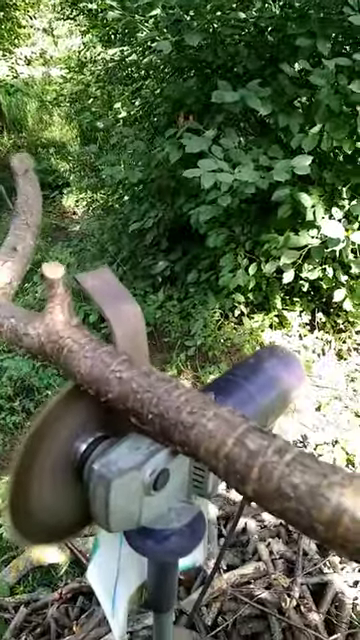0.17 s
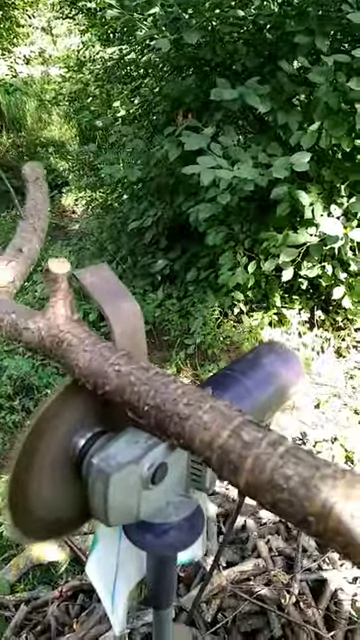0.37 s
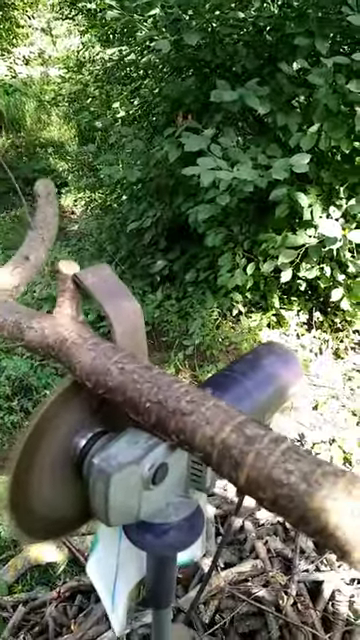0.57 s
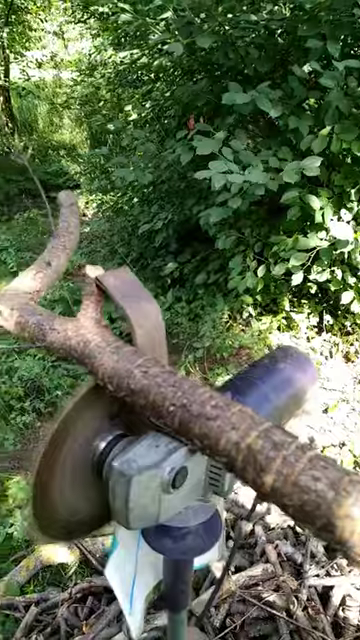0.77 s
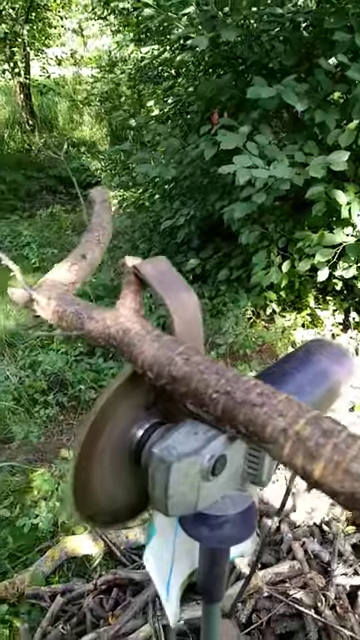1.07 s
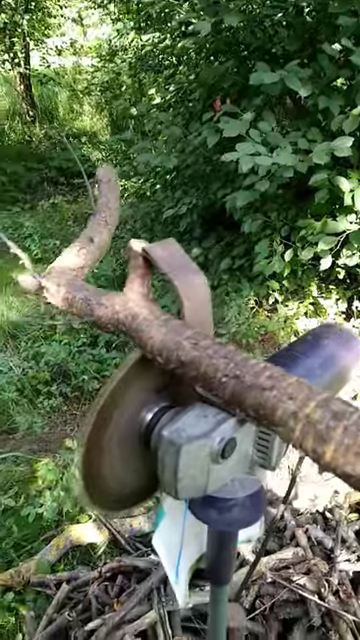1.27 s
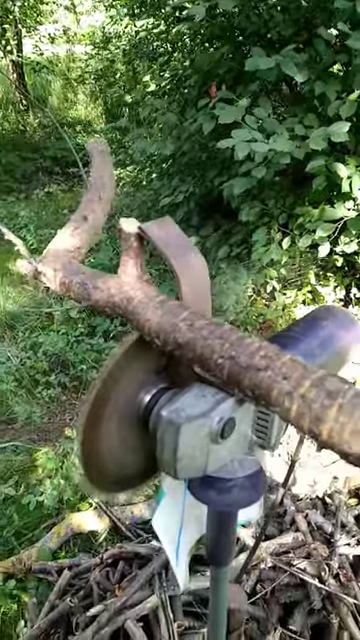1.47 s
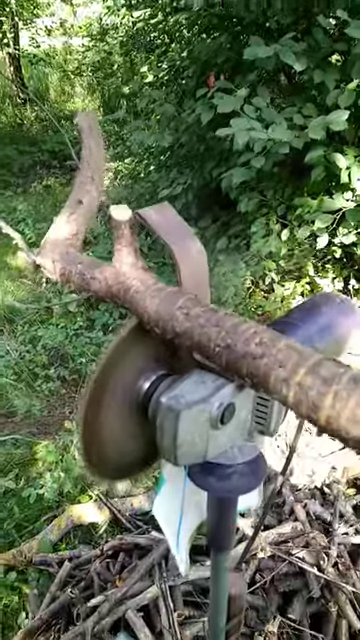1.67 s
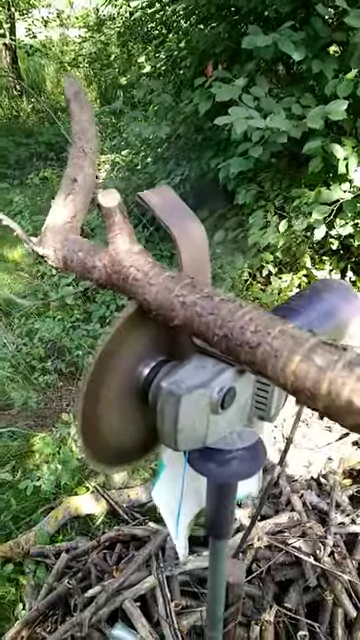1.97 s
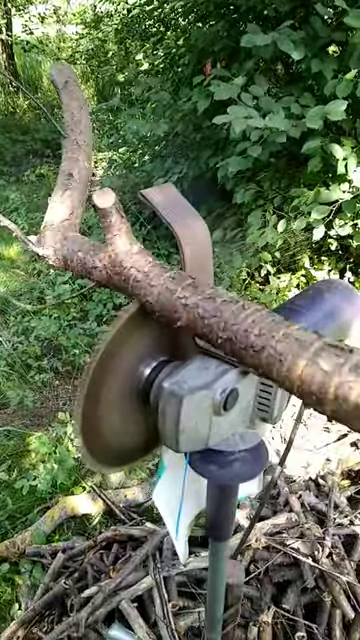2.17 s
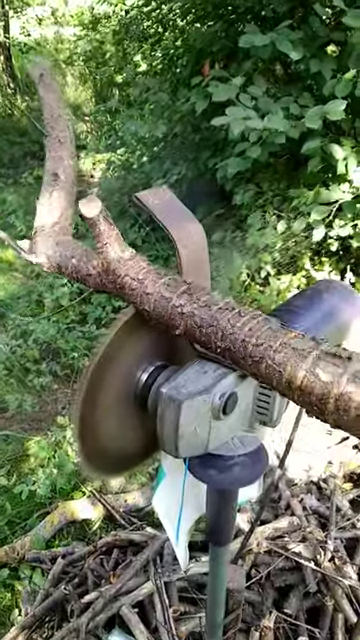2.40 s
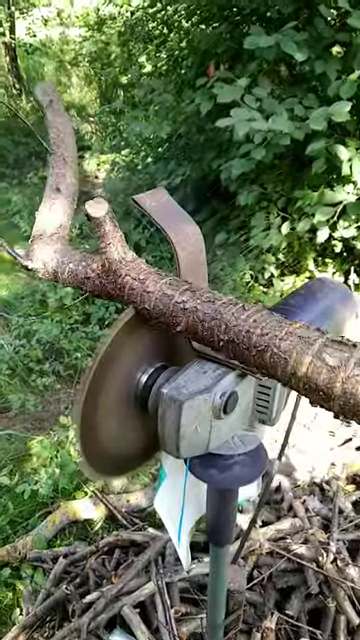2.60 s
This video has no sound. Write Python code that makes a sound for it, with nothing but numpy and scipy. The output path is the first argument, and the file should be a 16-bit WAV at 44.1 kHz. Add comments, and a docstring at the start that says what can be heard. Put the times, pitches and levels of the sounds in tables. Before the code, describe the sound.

An angle grinder runs loudly throughout, close and outdoors, with rushing fan air and gear whir. Bright, metallic rasping opens the cut; sharp squeals come at 0.4 and 0.6-0.75 seconds. The motor glides down in pitch until about 2.4. A brief screech hits at 1.3, woody scrapes and chip snaps around 1.6-2.2, and a hiss at 2.4-2.6. Soft wind puffs come mostly before 1.3.

```python
"""Branch on an angle grinder

A branch is pressed onto the saw disc of a mounted angle grinder, outdoors and close by.
The load drags the spindle down; the steel disc rings in modes that shift as it slows, and some sing or squeal.
Bands of noise make the teeth rasp in the wood, over the rush of the fan and the whir of the gears.
Puffs of low noise are the gusts that brush the microphone."""
import sys
import numpy as np
from scipy import signal
from scipy.fft import rfft, irfft
from scipy.io import wavfile

SR = 44100
rng = np.random.default_rng(int(sys.argv[2]) if len(sys.argv) > 2 else 0)


def put_to_file(sound):
    """Save the sound as 16-bit audio at rate SR, in the file named by the first command-line argument."""
    columns = np.atleast_2d(sound).T  # one column per channel
    safe = np.clip(columns, -1, 1)
    whole_steps = np.round(safe * 32767)
    wavfile.write(sys.argv[1], SR, whole_steps.astype(np.int16))


N = 120834
T, HZ = np.arange(N) / SR, np.fft.rfftfreq(N, 1 / SR)
CUTOFF_HZ = 15600


def amp(db):
    """Turns decibels into gain."""
    return 10 ** (np.asarray(db) / 20)


def unit(x):
    """Scales each channel to an average strength (rms) of 1."""
    return x / np.sqrt(np.mean(abs(x) ** 2, axis=-1, keepdims=True) + 1e-20)


def curve(rows, axis=1):
    """Reads one column of a time table at every sample."""
    rows = np.array(rows)
    return np.interp(T, rows[:, 0], rows[:, axis])


def spectrum(rows):
    """Reads a frequency table at every frequency of the spectrum."""
    hz, value = np.transpose(rows)
    return np.interp(np.log(HZ + 1), np.log(hz), value)


def pan(db):
    """Left and right gains of constant power; positive is louder on the left."""
    g = amp(np.array([[.5], [-.5]]) * db)
    return g / np.sqrt(np.mean(g ** 2, axis=0))


def noise(gain, likeness):
    """Coloured stereo noise; likeness 1 means both channels are the same, 0 unrelated."""
    a, b = rfft(rng.standard_normal((2, N)))
    c = np.clip(likeness, -1, 1)
    right = c * a + np.sqrt(1 - c ** 2) * b
    return unit(irfft(np.array([a, right]) * gain, N))


def wander(hz):
    """Smooth random movement, up to about the given rate."""
    return unit(irfft(rfft(rng.standard_normal(N)) * np.exp(-(HZ / hz) ** 2), N))


def flutter(hz):
    """Smooth random movement at a low rate, drawn on a coarse time grid."""
    count = N // 64
    coarse_hz = np.fft.rfftfreq(count, T[-1] / count)
    slow = irfft(rfft(rng.standard_normal(count)) * np.exp(-(coarse_hz / hz) ** 2), count)
    return np.interp(T, np.linspace(0, T[-1], count), unit(slow))


def phase(hz):
    """Running angle of a tone whose frequency may move."""
    return 2 * np.pi * np.cumsum(hz * np.ones(N)) / SR


SKIRT = 2.8  # the second filter is this many times wider


def resonate(x, hz, width_hz):
    """A moving resonance: shift its pitch to zero, smooth twice, shift back."""
    turn = np.exp(1j * phase(hz))
    z = x / turn
    for w in (width_hz, width_hz * SKIRT):
        r = np.exp(-np.pi * abs(w) / SR)
        z = signal.lfilter([1 - r], [1, -r], z)
    return unit((z * turn).real)


def band(low_hz, high_hz, steepness):
    """Gain of a band-pass at every frequency."""
    below = (low_hz / np.maximum(HZ, low_hz / 10)) ** (2 * min(steepness, 100))
    above = (HZ / high_hz) ** (2 * steepness)
    return 1 / np.sqrt((1 + below) * (1 + above))


# likeness of left and right in friction and fan noise: f/Hz, likeness (-1 to 1)
LEFT_RIGHT_LIKENESS = [(60, -0.18), (1000, 0.11), (2500, -0.047), (4500, -0.44), (8000, 0.072),
                       (14000, -0.14)]


def rub(low_hz, high_hz, level, steepness):
    """A band of friction noise that follows its level and left-right curves."""
    hiss = noise(band(low_hz, high_hz, steepness), spectrum(LEFT_RIGHT_LIKENESS))
    return hiss * amp(curve(level)) * pan(curve(level, axis=2))


PATCH_DB, PATCH_WIDTH_HZ, PATCH_S, PATCH_FROM_HZ = 5.8, 65, .07, 2700  # dB at depth 1


def uneven_treble(x, depth):
    """Uneven treble: small random patches of the sound grow louder and softer."""
    hz, t, z = signal.stft(x, SR, nperseg=1024, noverlap=768)
    across = np.fft.fftfreq(len(hz), hz[1])[:, None]
    along = np.fft.fftfreq(len(t), t[1])
    smooth = np.exp(-(np.pi * across * PATCH_WIDTH_HZ) ** 2 - (np.pi * along * PATCH_S) ** 2)
    field = np.fft.ifft2(np.fft.fft2(rng.standard_normal(smooth.shape)) * smooth).real
    # starts at half of PATCH_FROM_HZ and is full from there up
    depth_db = depth * PATCH_DB * np.clip(2 * hz / PATCH_FROM_HZ - 1, 0, 1)[:, None]
    gain = amp(depth_db * np.minimum(field / field.std(), 1))
    return signal.istft(z * gain, SR, nperseg=1024, noverlap=768)[1][:, :N]


# speed of the spindle under load: t/s, speed (turns per second)
SPINDLE_SPEED = [(0, 154), (.35, 148.6), (.78, 138.6), (1.3, 128.8), (1.7, 122.6), (2, 119.9), (2.4, 118.2),
                 (2.74, 118.5)]
FAST_HZ, SLOW_HZ = 154, 118.2  # turns per second
WOBBLE, WOBBLE_HZ = 0.001112, 25.85  # share of the speed, rate


def spindle():
    """The load slows the spindle: its speed, how far it has slowed (0 to 1) and its angle."""
    spin = curve(SPINDLE_SPEED)
    slowed = (FAST_HZ - spin) / (FAST_HZ - SLOW_HZ)
    angle = phase(spin * (1 + WOBBLE * wander(WOBBLE_HZ)))
    return spin, slowed, angle


MODE_SWELL_DB, MODE_SWELL_HZ, MODE_DRIFT = 3.3, 9, .0014  # drift is a share of the frequency


def mode(drive, hz, width_hz):
    """One disc mode swells, fades and drifts as the branch shifts on the rim."""
    swell = unit(amp(MODE_SWELL_DB * np.minimum(flutter(MODE_SWELL_HZ), 1)))
    return swell * resonate(drive, hz * (1 + MODE_DRIFT * flutter(MODE_SWELL_HZ)), width_hz)


# ringing modes of the steel disc, before the ringing strength below:
# f/Hz at full speed, f/Hz slowed, level/dB at full speed, level/dB slowed, width/Hz, left over right/dB
DISC_MODES = [(3280, 3190, -27.5, -40.5, 105, -20), (3546, 3620, -42, -38, 33, -5),
              (4155, 3900, -31, -50, 60, -7), (4730, 4832, -35.5, -42, 29, 4),
              (6200, 6248, -52, -32.5, 30, -4), (6450, 6440, -26, -65, 27, -4),
              (7700, 7415, -38.5, -31, 47, -3), (7905, 7500, -26, -31.5, 15, -10),
              (7780, 7850, -41, -44.5, 41, 7), (9220, 8860, -27.5, -36.5, 45, 5),
              (9420, 9252, -23.5, -32.5, 44, -9), (10630, 10270, -32, -34, 71, 14),
              (10920, 10720, -41, -37, 70, 11), (11720, 11210, -46, -39.5, 31, 8),
              (12150, 11700, -41.5, -41.5, 33, 8), (13400, 13280, -36, -36, 53, 8)]
# how hard the disc is set ringing: t/s, level/dB added to every mode
RING_STRENGTH = [(0, -3), (.55, -3), (.7, 2.5), (.85, -5), (1.3, -1), (2.2, -2.5), (2.74, 0)]
TOOTH_SHARE, TOOTH_SPREAD_DB, DISC_LIKENESS = 0.13, 5.5, 0.54


def disc(angle, slowed):
    """Friction and the once-a-turn pattern of the teeth ring the modes of the disc."""
    orders = np.arange(18, 128)  # waves per turn
    chance = rng.standard_normal((len(orders), 2))
    grid = np.linspace(0, 2 * np.pi, 4096)
    pattern = 0
    for k, (a, b) in zip(orders, chance):
        pattern = pattern + amp(TOOTH_SPREAD_DB * a) * np.cos(k * grid + 2 * np.pi * b)
    teeth = unit(np.interp(angle % (2 * np.pi), grid, pattern))
    friction = noise(HZ < CUTOFF_HZ, DISC_LIKENESS)
    drive = np.sqrt(TOOTH_SHARE) * teeth + np.sqrt(1 - TOOTH_SHARE) * friction
    out = 0
    for fast, slow, fast_db, slow_db, width, side_db in DISC_MODES:
        level = amp(fast_db + (slow_db - fast_db) * slowed)
        out = out + pan(side_db) * level * mode(drive, fast + (slow - fast) * slowed, width)
    return out * amp(curve(RING_STRENGTH))


# a whining mode of the disc: t/s, level/dB
WHINE_LEVEL = [(0, -44), (.2, -33.5), (.34, -23), (.45, -29.5), (.56, -23.5), (.66, -33.5), (.76, -27.5),
               (.88, -31.5), (1.21, -33), (1.28, -19.5), (1.36, -37), (1.49, -28), (1.6, -33.5),
               (1.67, -28.5), (1.85, -34.5), (2.3, -31), (2.74, -28.5)]
WHINE_FAST_HZ, WHINE_SLOW_HZ, WHINE_WIDTH_HZ = 4430, 4320, 47
WHINE_CLEAN, WHINE_WOBBLE = 0.47, 0.003796  # power share of pure tone, share of the frequency
WHINE_GLIDE_SHARE, WHINE_GLIDE_WIDTH_HZ = .45, 100


def whine(angle, slowed):
    """One mode sings; multiples of the spindle speed glide down through it and roughen its edge."""
    hz = WHINE_FAST_HZ + (WHINE_SLOW_HZ - WHINE_FAST_HZ) * slowed
    tone = unit(np.sin(phase(hz * (1 + WHINE_WOBBLE * wander(hz=35.0)))))
    teeth = sum(np.cos(k * angle + 2 * np.pi * rng.random()) for k in range(27, 40))
    glide = resonate(teeth, hz, WHINE_GLIDE_WIDTH_HZ)
    friction = resonate(noise(1, 0.47), hz, WHINE_WIDTH_HZ)
    rough = np.sqrt(WHINE_GLIDE_SHARE) * glide + np.sqrt(1 - WHINE_GLIDE_SHARE) * friction
    return (np.sqrt(WHINE_CLEAN) * tone + np.sqrt(1 - WHINE_CLEAN) * rough) * amp(curve(WHINE_LEVEL))


# the singing mode, between squeals: t/s, level/dB, left over right/dB
SING_LEVEL = [(0, -21, -15), (.17, -20.5, -17), (.28, -16.5, -17), (.39, -22, -7), (.58, -21.5, 1),
              (.79, -22.5, -4), (.85, -36, -11), (1.3, -31.5, -18), (1.55, -34.5, -23), (2.05, -32, -19),
              (2.15, -38, -10), (2.4, -26.5, 1), (2.6, -30, 0), (2.74, -43, -9)]
SING_FAST_HZ, SING_SLOW_HZ, SING_WIDTH_HZ, SING_CLEAN = 5927, 5748, 32, 0.3
# squeals as the teeth catch: t/s, length/s, level/dB
CATCHES = [(0.374, 0.029, -16), (.599, 0.031, -10), (0.627, 0.015, -12.5), (0.645, 0.033, -11.5),
           (0.684, 0.026, -10), (0.72, 0.021, -13.5)]
SQUEAL_RISE_S, SQUEAL_FALL_S, SQUEAL_PAN_DB, SQUEAL_HZ = 0.0069, 0.014, -6, 5848


def squeal(slowed):
    """One mode sings all along; when the teeth catch it drops to half under a pure squeal."""
    hz = SING_FAST_HZ + (SING_SLOW_HZ - SING_FAST_HZ) * slowed
    tone = unit(np.sin(phase(hz * (1 + 0.0017 * wander(hz=39.3)))))
    rough = resonate(noise(1, 0.84), hz, SING_WIDTH_HZ)
    sing = np.sqrt(SING_CLEAN) * tone + np.sqrt(1 - SING_CLEAN) * rough
    gates, bursts = [], 0
    for start, length, db in CATCHES:
        rise = np.clip((T - start) / SQUEAL_RISE_S, 0, 1)
        fall = np.clip((start + length - T) / SQUEAL_FALL_S + .5, 0, 1)
        gates.append(rise * fall)
        bursts = bursts + amp(db) * rise * fall
    shriek = bursts * unit(np.sin(phase(SQUEAL_HZ * (1 + 0.0021 * wander(hz=70)))))
    sing = sing * (1 - .5 * np.max(gates, axis=0)) * amp(curve(SING_LEVEL))
    return sing * pan(curve(SING_LEVEL, axis=2)) + shriek * pan(SQUEAL_PAN_DB)


# the main rasp of the cut: t/s, level/dB, left over right/dB
MAIN_RASP = [(0, -20.5, -3), (.18, -23, -6), (.27, -14, -8), (.35, -20, -2.5), (.55, -20.5, -3),
             (.72, -19.5, -2), (.8, -26, 7), (.87, -31, -1), (1.23, -49, 7), (1.29, -20, -3),
             (1.36, -31, -1), (1.63, -34, 9), (1.7, -25.5, 7), (1.8, -38, 19), (2.74, -54, 0)]
RASP_BAND_HZ = (5110, 6060)
# a brighter rasp: t/s, level/dB, left over right/dB
BRIGHT = [(0, -21.5, -25), (.2, -30, -4), (.28, -19, -26), (.35, -37, 2), (.42, -20, 12), (.52, -35, -4),
          (.59, -48, 9), (.63, -18.5, -2.5), (.74, -16.5, 0), (.81, -41, 4), (.95, -30, 2), (2.74, -54, 2)]
# the hiss between the two rasps: t/s, level/dB, left over right/dB
HISS = [(0, -21, -23), (.2, -31, -12), (.27, -19, -19), (.34, -72, -3), (1.8, -34, 2), (2.22, -28.5, 0),
        (2.36, -25, 4), (2.42, -18.5, -5.5), (2.56, -19, -5), (2.66, -33, 5), (2.74, -49, 0)]
# the fizz at the top: t/s, level/dB, left over right/dB
FIZZ = [(0, -29, 3), (.16, -29, 2), (.21, -22, -5), (.27, -31, -6), (.32, -16, -11), (.355, -22, -19),
        (.39, -36, -3), (.52, -23.5, -4), (.58, -54, -5), (.9, -58, 4)]
# bands of the hissing part of the cut: low f/Hz, high f/Hz, level curve
CUT_BANDS = [(7480, 9630, BRIGHT), (5930, 7950, HISS), (11930, 14900, FIZZ)]
EDGE_STEEPNESS, CHATTER, CHATTER_HZ, TURN_DEPTH = 140, 0.053, 260, 0.051


def cut(angle):
    """Teeth tear the wood: a dense screech and uneven hiss that chatter and throb with each turn."""
    screech = rub(*RASP_BAND_HZ, MAIN_RASP, EDGE_STEEPNESS)
    hiss = uneven_treble(sum(rub(*row, EDGE_STEEPNESS) for row in CUT_BANDS), depth=0.28)
    throb = unit(np.exp(CHATTER * wander(CHATTER_HZ) + TURN_DEPTH * np.cos(angle)))
    return (screech + hiss) * throb


# the woody scrape: t/s, level/dB, left over right/dB
SCRAPE = [(0, -29.5, 1), (.47, -30, 1), (.57, -35, -11), (.7, -28.5, 0), (.95, -39.5, 11), (1.4, -41, 15),
          (1.63, -31.5, 10), (1.82, -36.5, 4), (2, -39, 9), (2.13, -32, 4), (2.22, -29, 5), (2.33, -46, 10)]
# a duller scrape: t/s, level/dB, left over right/dB
DULL = [(1.5, -45, 3), (1.62, -25.5, 8), (1.66, -42, 5), (1.71, -28.5, 15), (1.8, -50, 3)]
# bands of the scraping on the wood: low f/Hz, high f/Hz, level curve
WOOD_BANDS = [(2690, 3570, SCRAPE), (1250, 2870, DULL)]
WOOD_STEEPNESS, WOOD_GRAIN, WOOD_GRAIN_HZ = 7, .42, 170
# chips torn from the wood: t/s, level/dB at the start
CHIP_SNAPS = [(1.616, -27), (1.875, -27), (2.068, -22.5), (2.075, -25.5)]
CHIP_DECAY_S = 0.0038


def scrape():
    """The rim scrapes the wood in uneven grains, and a few chips snap off as short noise bursts."""
    grain = unit(np.exp(WOOD_GRAIN * np.minimum(wander(WOOD_GRAIN_HZ), 2)))
    snaps = sum(amp(db) * (T >= s) * np.exp(-abs(T - s) / CHIP_DECAY_S) for s, db in CHIP_SNAPS)
    chips = snaps * noise(band(*WOOD_BANDS[0][:2], WOOD_STEEPNESS), 0.43)
    return grain * sum(rub(*row, WOOD_STEEPNESS) for row in WOOD_BANDS) + chips


# tone colour of the fan and motor rush: f/Hz, relative level/dB (per Hz)
RUSH_COLOUR = [(40, -15), (90, -3), (250, -0.5), (600, -1), (1100, -1), (1700, 1.5), (2500, 1), (3300, -3),
               (3800, -2.5), (4200, 4), (4650, -5), (5500, 0.5), (6700, -6), (7700, 4.5), (8500, -4.5),
               (9200, 1), (9900, -3), (12500, -2.5), (15500, -3)]
# strength of the rush: t/s, level/dB
RUSH_STRENGTH = [(0, -25.5), (.8, -23.5), (1.2, -25), (1.65, -25), (2.1, -25), (2.74, -25)]


def fan():
    """Broad rush of cooling air and gears, slightly unsteady."""
    rush = noise(amp(spectrum(RUSH_COLOUR)), spectrum(LEFT_RIGHT_LIKENESS))
    return rush * amp(curve(RUSH_STRENGTH) + .5 * wander(hz=30))


# whir of gears and teeth, before its sway: f/Hz, level/dB of one partial
WHIR_PARTIALS = [(1800, -60), (2500, -51), (2850, -43.5), (3500, -45.5), (5500, -48), (9000, -62)]
WHIR_SWAY_DB, WHIR_SWAY_HZ = 5.5, 9


def whir(spin, angle):
    """Many close multiples of the spindle speed glide down together, each swelling on its own."""
    hz, db = np.transpose(WHIR_PARTIALS)
    out = 0
    for k in range(14, 68):
        sway_db = WHIR_SWAY_DB * np.minimum(flutter(WHIR_SWAY_HZ), 1)
        gain = amp(np.interp(k * spin, hz, db) + sway_db)
        out = out + gain * np.cos(k * angle + 2 * np.pi * rng.random((2, 1)))
    return out


# tone colour of the wind on the microphone: f/Hz, relative level/dB (per Hz)
WIND_COLOUR = [(20, -22), (40, -17), (75, 2), (130, -0.5), (260, -8.5), (500, -25), (2500, -80)]
# puffs of air: t/s at the peak, half length/s, level/dB
PUFFS = [(0.377, 0.0092, -37), (0.479, 0.021, -34.5), (0.518, 0.014, -30), (0.589, 0.016, -31),
         (0.684, 0.014, -39), (0.868, 0.011, -36), (1.188, 0.0096, -33), (1.227, 0.011, -35),
         (1.57, 0.062, -47)]
BREEZE_DB, BREEZE_SWAY_DB, WIND_PAN_DB = -48.5, 2.5, -12
BUFFET_S, BUFFET_HALF_S, BUFFET_DB, BUFFET_BAND_HZ = 0.56, 0.073, -31.5, (160, 350)


def wind():
    """A faint breeze, low puffs of air and one longer, brighter buffet, mostly on the right."""
    breeze = amp(BREEZE_DB + BREEZE_SWAY_DB * np.tanh(wander(hz=14)))
    puffs = sum(amp(db) * np.exp(-((T - s) / half) ** 2) for s, half, db in PUFFS)
    swell = amp(BUFFET_DB) * np.exp(-abs(T - BUFFET_S) / BUFFET_HALF_S)
    buffet = swell * noise(band(*BUFFET_BAND_HZ, 4.7), 0)
    return (noise(amp(spectrum(WIND_COLOUR)), 0) * (breeze + puffs) + buffet) * pan(WIND_PAN_DB)


def scene():
    """Adds all sources; those of the machine follow the spindle."""
    spin, slowed, angle = spindle()
    steel = disc(angle, slowed) + whine(angle, slowed) + squeal(slowed)
    wood = cut(angle) + scrape()
    motor = uneven_treble(fan() + whir(spin, angle), depth=1)
    return steel + wood + motor + wind()


def record(dry):
    """Rounds off the loudest peaks, then removes everything above the cutoff."""
    over = np.maximum(abs(dry) - .65, 0)
    dry = dry - np.sign(dry) * (over - .25 * np.tanh(over / .25))
    low_pass = signal.firwin(511, CUTOFF_HZ, window=("kaiser", 9), fs=SR)
    return signal.oaconvolve(dry, low_pass[None], "same")


dry = scene()
out = record(dry)
put_to_file(out)
```